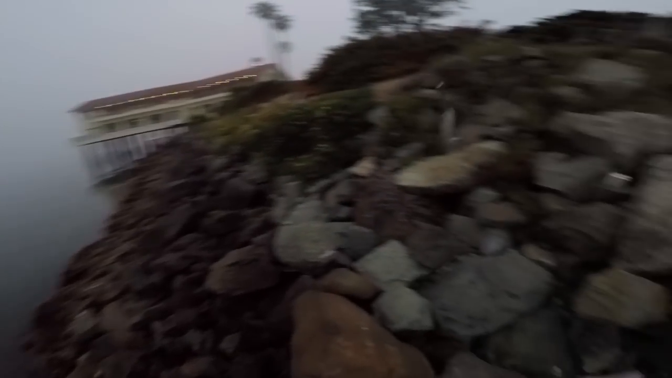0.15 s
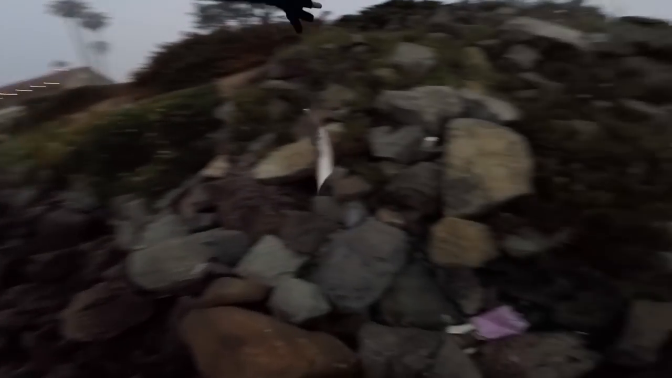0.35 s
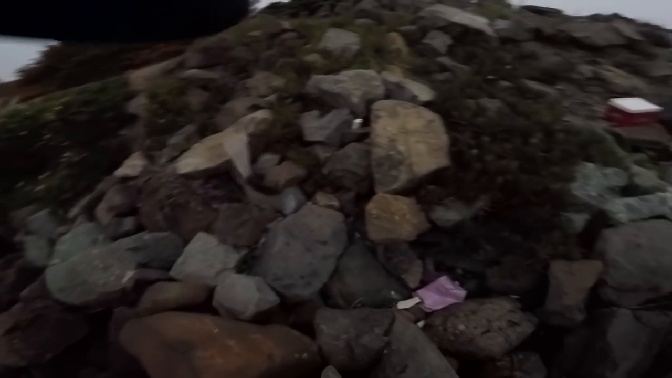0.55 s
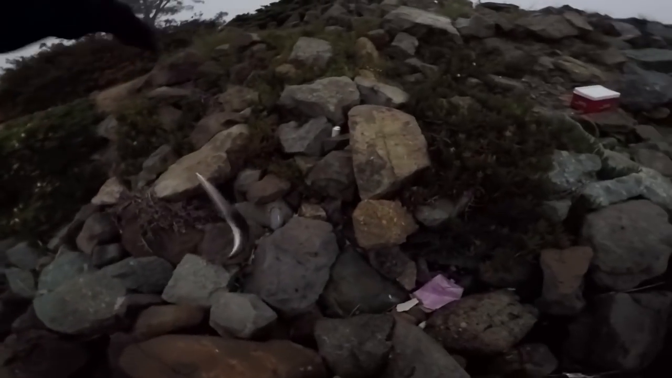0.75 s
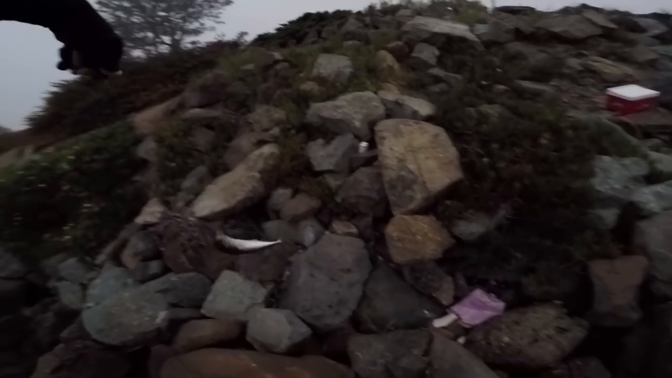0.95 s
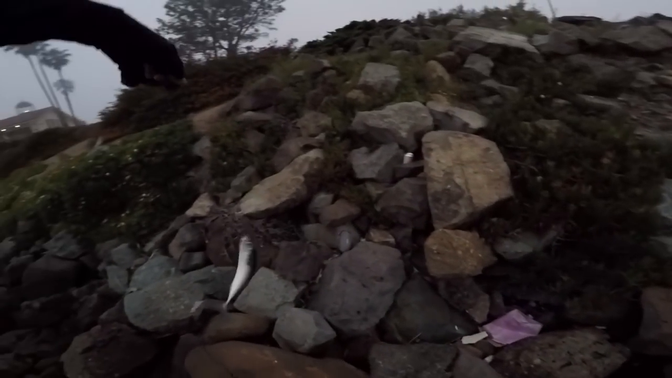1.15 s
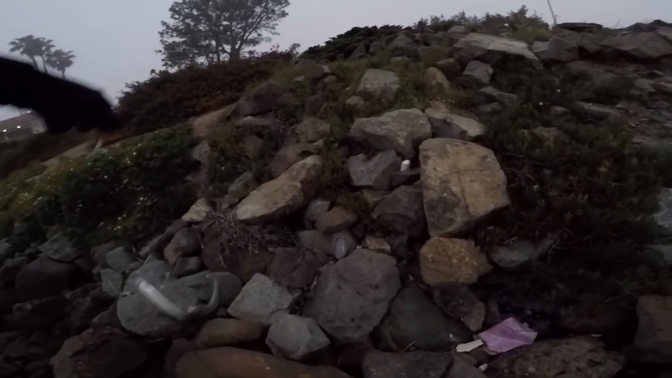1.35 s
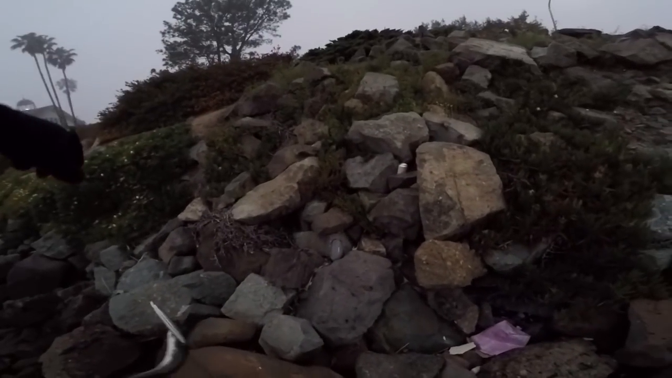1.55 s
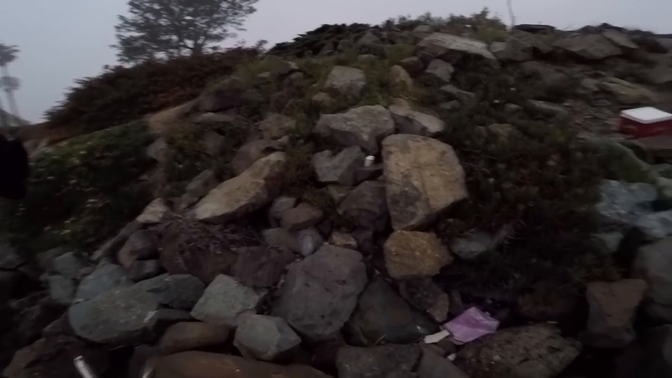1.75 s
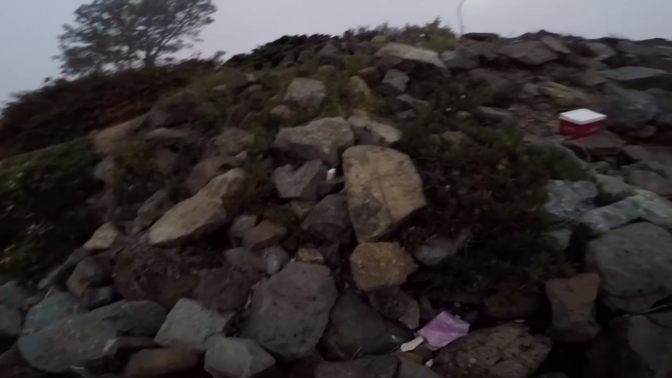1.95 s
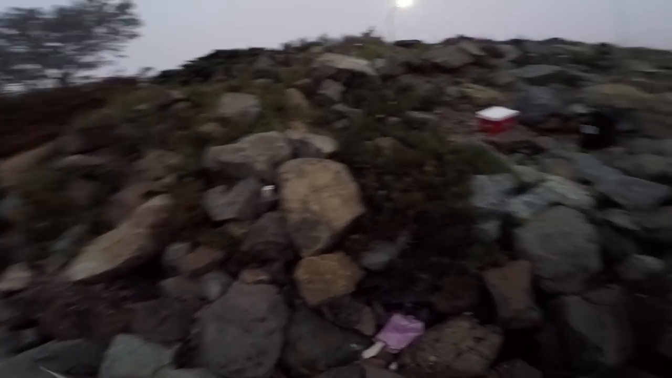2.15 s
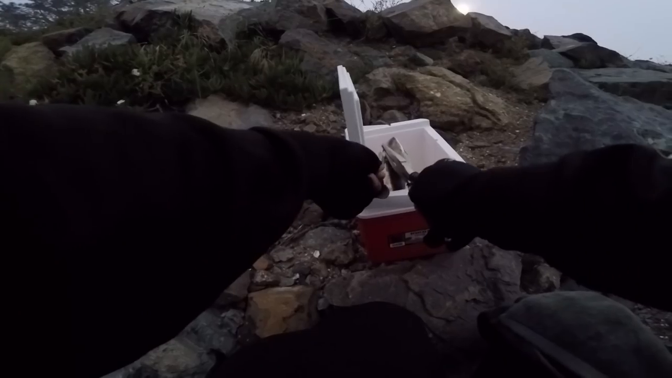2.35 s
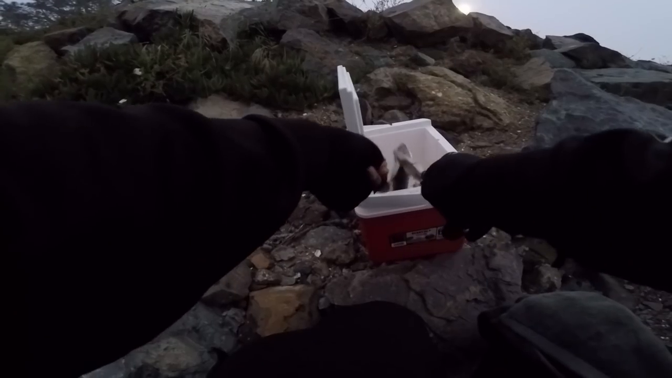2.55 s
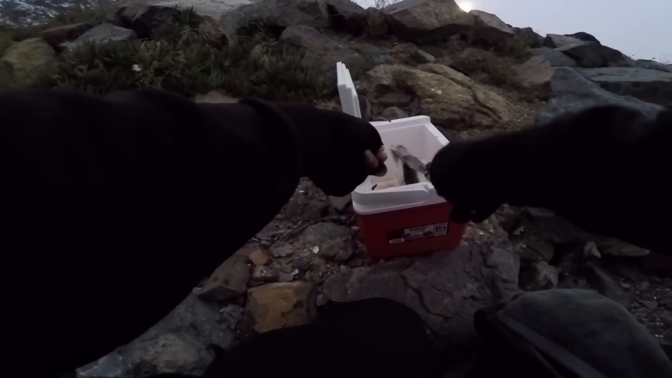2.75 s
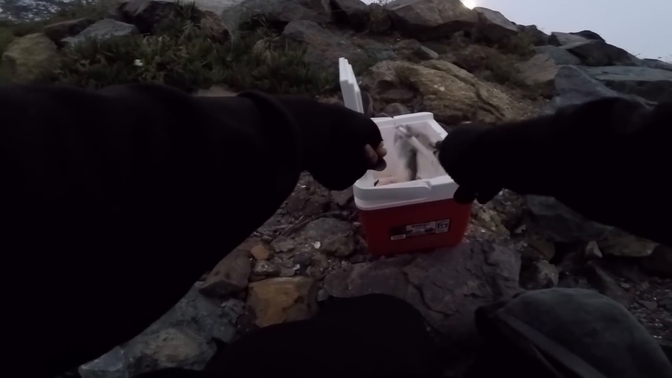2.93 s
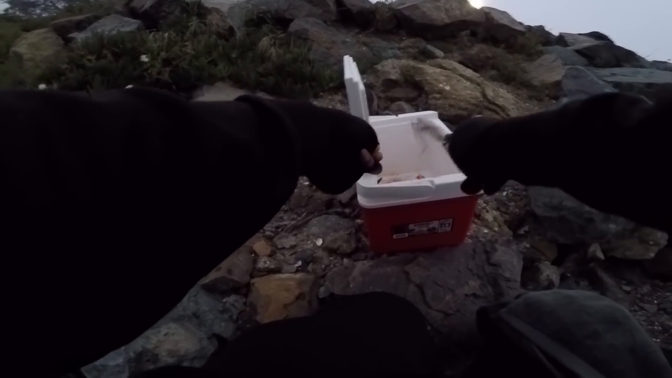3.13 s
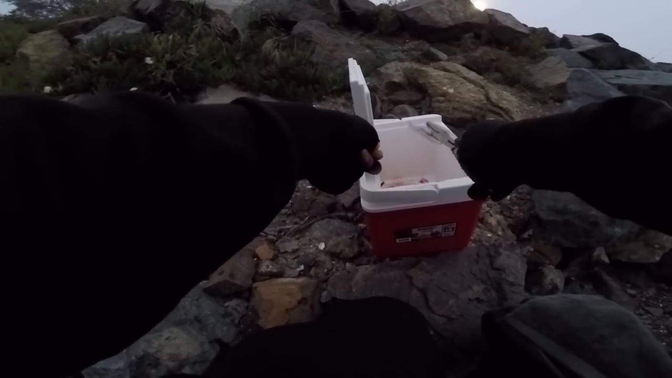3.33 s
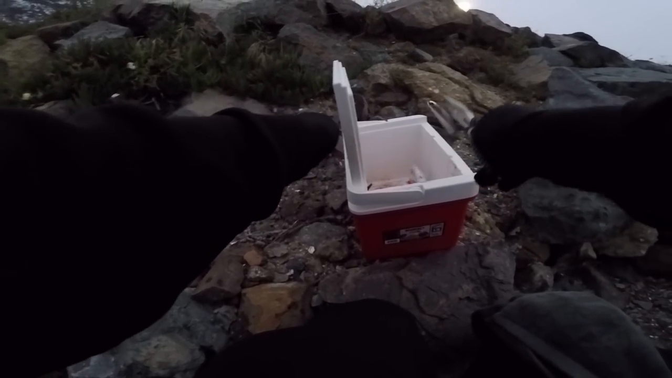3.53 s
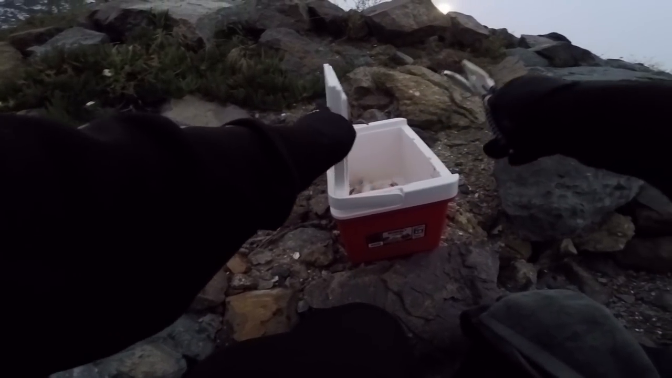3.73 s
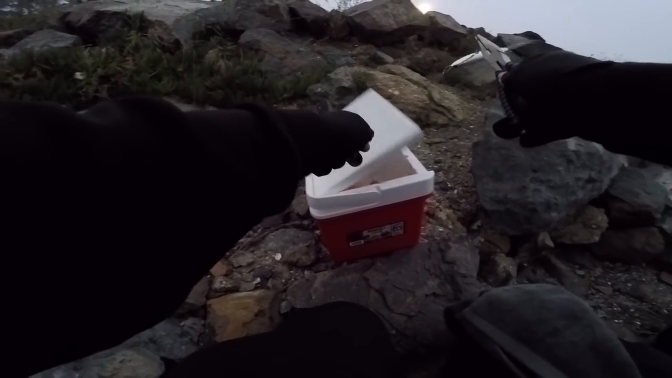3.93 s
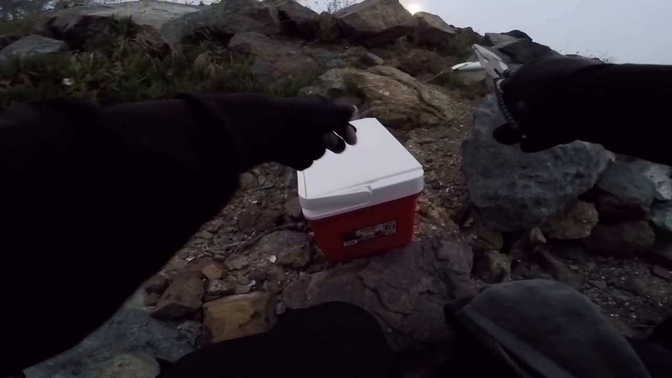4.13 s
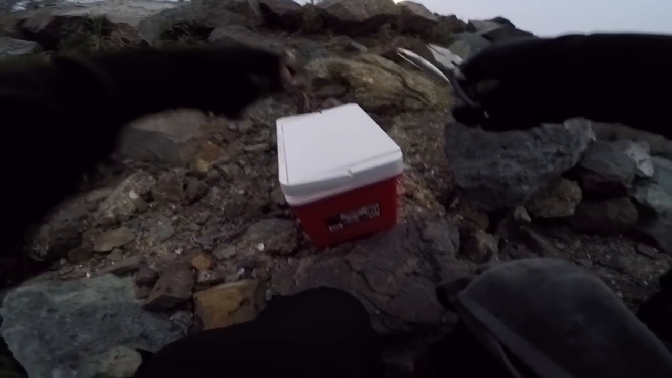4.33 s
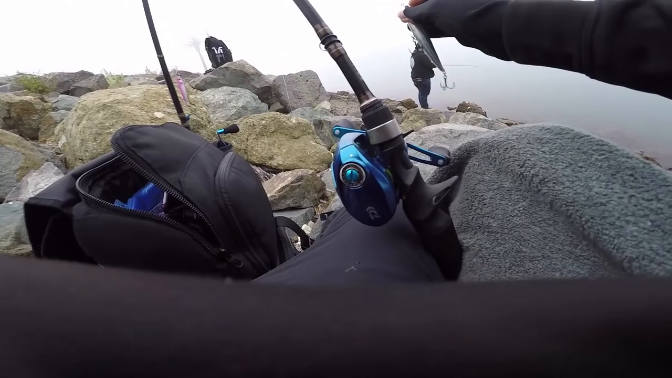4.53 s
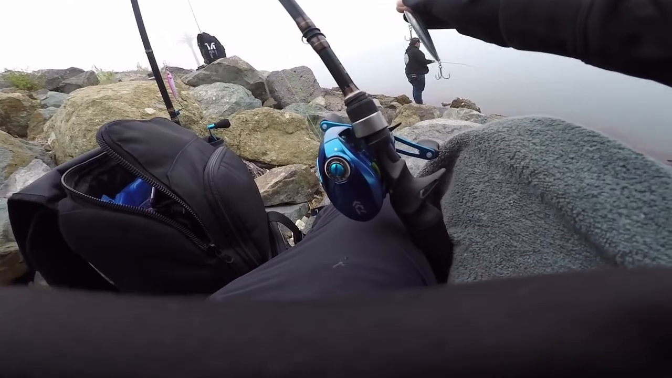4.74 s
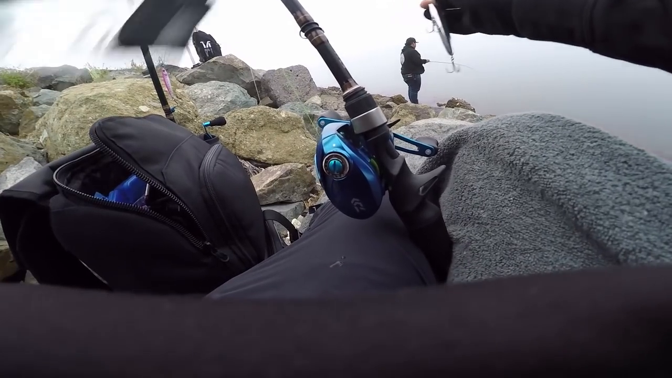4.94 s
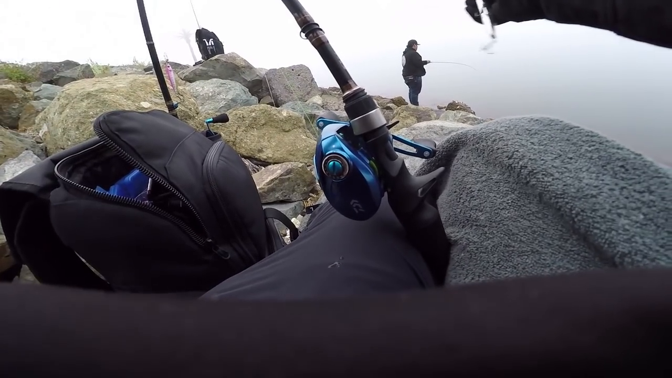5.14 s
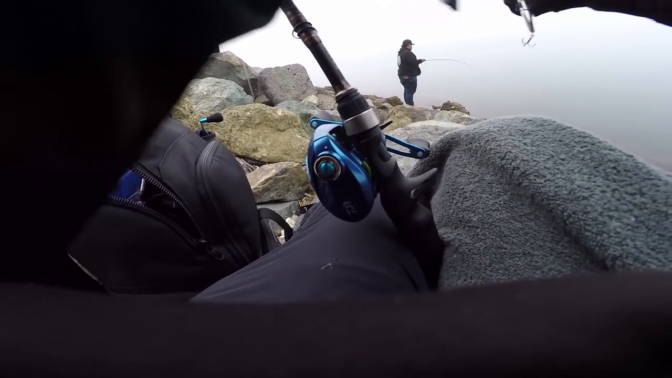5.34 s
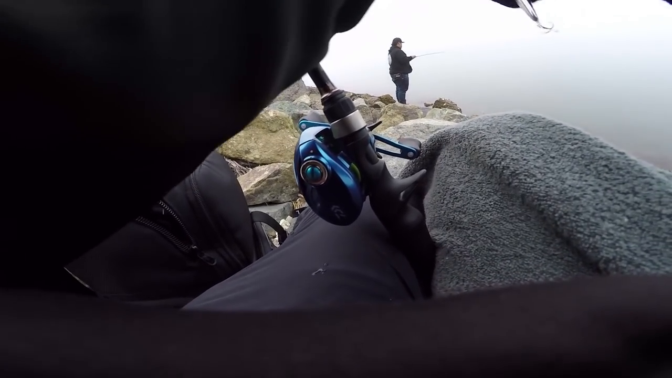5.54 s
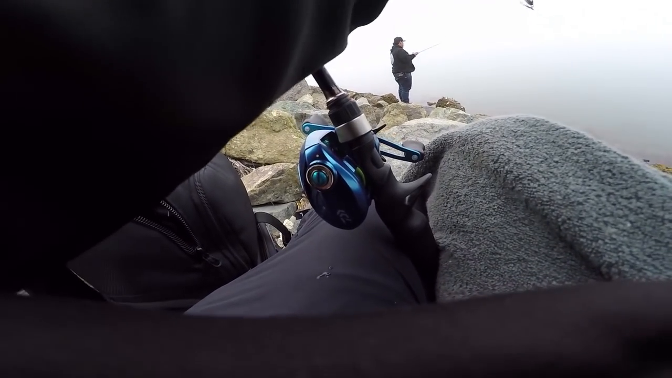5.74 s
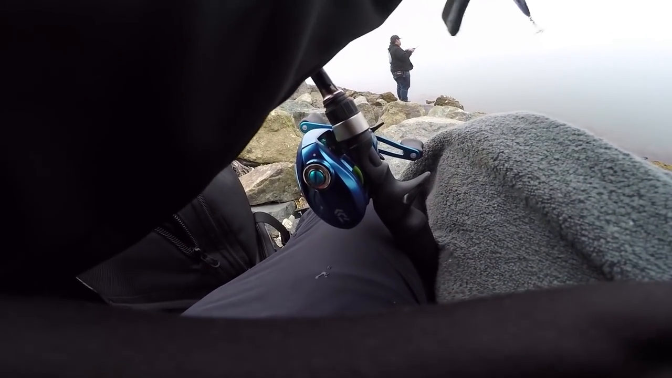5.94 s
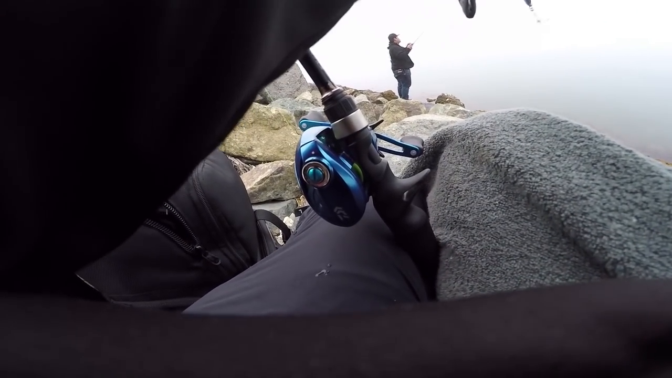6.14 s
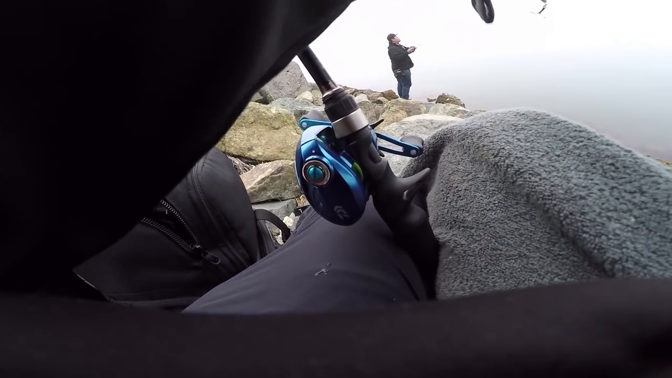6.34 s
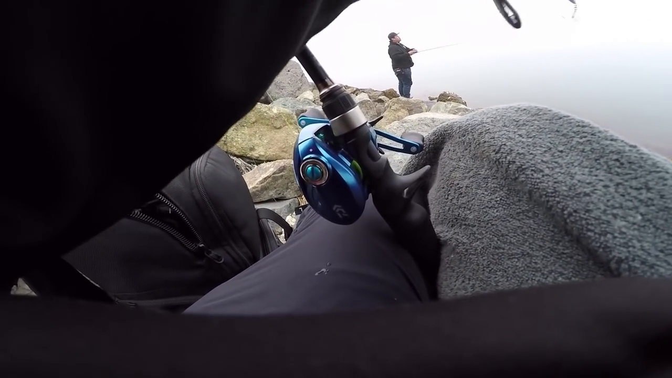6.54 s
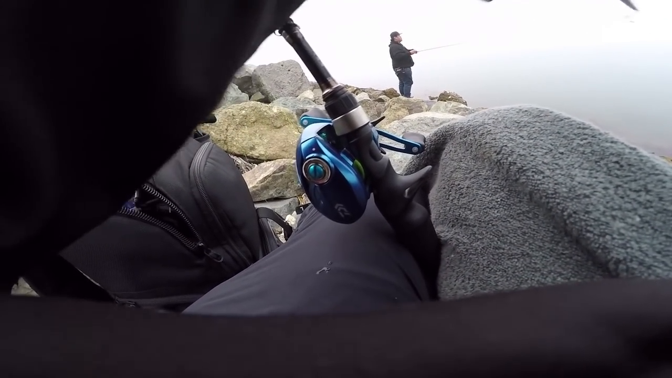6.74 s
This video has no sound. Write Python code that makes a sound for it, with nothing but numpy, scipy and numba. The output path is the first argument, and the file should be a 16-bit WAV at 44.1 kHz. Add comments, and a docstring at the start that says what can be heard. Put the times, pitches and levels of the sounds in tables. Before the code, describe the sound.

Outdoors on shore rocks, a body-worn microphone picks up a constant low rumble and the close, crisp crackle of a moving jacket. Hollow knocks on a plastic cooler join in, leading to a deep thump as the lid closes. After a quieter stretch with a sliding sleeve and scattered creases, a hook-and-loop flap tears open, first in separate pops, then in a dense rip.

```python
"""Jacket cloth crackles and rubs on the microphone port of a chest-worn camera, on a rocky shore.
Under it a low rumble wavers in a faint wash of air. Hands knock a plastic cool box and shut its lid:
the walls ring, squeezed air thuds. A boot squeaks twice on stone, thin hisses pass, a sleeve slides.
Last, a hook-and-loop flap rips open: single hooks pop, then tear densely."""
import sys
import numpy as np
from scipy import signal
from scipy.fft import rfft, irfft
from scipy.io import wavfile
from scipy.ndimage import uniform_filter1d
from numba import njit

SR = 44100
rng = np.random.default_rng(int(sys.argv[2]) if len(sys.argv) > 2 else 0)


def generate_wav(sig):
    """Save sig (samples, or channels by samples) to the path in sys.argv[1] as 16-bit PCM at SR."""
    pcm = np.round(np.clip(np.atleast_2d(sig).T, -1, 1) * 32767).astype(np.int16)
    wavfile.write(sys.argv[1], SR, pcm)


N = 303408

# loud creases (time [s], peak [dB], relative tail [dB], dull tilt [dB], bright tilt [dB])
CREASE_SNAPS = [(0.0303, -16.5, -12, -5, -4), (0.0645, -27, -16, -17, -1), (0.1002, -16, -17, -12, -5),
                (0.1924, -15, -20, -17, -15), (0.2098, -11, -16, -17, -9), (0.2366, -13, -24, -8, -9),
                (0.2713, -22, -6.5, -16, -6.5), (0.3232, -13, -13.5, -6, -8.5), (0.407, -18, -28, -27, -11),
                (0.4656, -22.5, -22, -20, -9), (0.4852, -18.5, -12, -9, -12), (0.5317, -19.5, -20, -5, -6),
                (0.5992, -18, -24, -6.5, -11), (0.6325, -13.5, -14.5, -9.5, -3), (0.6856, -23, -14, -3, -9),
                (0.749, -22.5, -4.5, -11, -5), (0.7716, -17, -8, -7.5, -3.5), (0.854, -24.5, -8, -5, 1),
                (0.9569, -19.5, -13, 1, -7), (0.9773, -18.5, -27, -14, -7), (1.0025, -16, -19, -17, -11),
                (1.0154, -19.5, -3.5, -16, -6.5), (1.0687, -17, -30, -21, -11), (1.104, -17, -9, -12, -6),
                (1.1317, -14, -19, -15, -9), (1.1841, -23, -2, -9, -2.5), (1.1983, -10.5, -40, -9, -7),
                (1.2267, -24, -15, -23, -8), (1.273, -22, -12, -6.5, 1), (1.304, -16.5, -8, -11, -9),
                (1.3466, -13.5, -15, -16, -5), (1.357, -10.5, -16, -10.5, -7), (1.4728, -29, -5, -21, -3),
                (1.506, -20, -15, -10, -11), (1.5342, -19.5, -11, -11, -7), (1.5925, -24, -8, -9.5, -8),
                (1.7032, -27.5, -10.5, -8, -3), (1.773, -20, 0, -5.5, -2.5), (1.79, -18.5, -12, -7, -4),
                (1.8203, -23, -14, -4, -5), (1.9056, -27, 0.5, -7.5, -4), (2.0088, -27, -11, -15, -3),
                (2.0387, -28, -22, -11, -4), (2.1161, -24, -8, -8, -10), (2.155, -19.5, -6, -9, -7),
                (2.209, -24.5, -23, -10, -5), (2.3107, -18, -12.5, -13, -3), (2.5047, -22, -5, -9, -12),
                (2.5204, -25, -24, -14, -13), (2.5802, -26, -5.5, -7.5, -6),
                (2.607, -17.5, -12.5, -5.5, -9), (2.6486, -22, -13, -17, -20), (2.6689, -25, -3, -15, -7),
                (2.7019, -23.5, -3, -9.5, -11), (2.7202, -18.5, -2.5, -4.5, -5.5),
                (2.7636, -18, -6, -13, -10), (2.8022, -15, -25, -27, -14), (2.8349, -9.5, -8, -9.5, -9),
                (2.8399, -26, -9, -13, -8), (2.8659, -36, -28, -19, -11), (2.954, -13, -2.5, -1.5, -5),
                (2.9854, -15, -15, -11, -8), (3.0024, -6, -8.5, -23, -3), (3.0111, -9.5, -14, -4.5, -3),
                (3.0591, -15.5, -1.5, -14, -7), (3.1088, -15, -1.5, -13, -5), (3.1759, -8.5, -7, -6, -4.5),
                (3.2151, -21.5, -2, -16, 1), (3.242, -15, -4.5, -11, -8), (3.2722, -17, -5, -11, -5),
                (3.2867, -6.5, -6.5, -7.5, -1), (3.313, -17, -11, -11, -6), (3.34, -15, -9.5, -0.5, 2.5),
                (3.3912, -25, -4, -13, -11), (3.4624, -18, -8, -3, 2.5), (3.5688, -32, -21, -24, -11),
                (3.591, -21.5, -6, -20, -11), (3.6556, -5.5, -29, -25, -33), (3.7506, -27, -13, -9, -15),
                (3.8217, -26.5, -26, 5, -5), (4.0613, -22.5, 0, 2, -9), (4.205, -20.5, -15, 4, -6),
                (4.9763, -22.5, -24, -4.5, -24), (5.1307, -30, -20, -11, -11), (5.1455, -21, -2, -11, -4),
                (5.1503, -7, -20, -16, -10), (5.2031, -16, -18, -15.5, -13), (5.2796, -15.5, -32, -24, -26),
                (5.289, -34, -16, -1, -15), (5.5004, -40, -8, -3, -14), (5.5231, -34, -12, -8, -6),
                (5.6531, -29.5, -6, -8, -9), (5.7486, -22, -24, -4, -21), (5.758, -22.5, -13, -9, -11),
                (5.8523, -27, -8.5, -0.5, -7), (5.88, -34.5, -5, -7, -10), (5.993, -33, -22, -1, -14),
                (6.002, -37, -24, -4, -14), (6.0696, -33, -15, -2, -25), (6.2298, -32.5, -19, 1, -15)]
# cloth rubbing (time [s], level [dB], dull tilt [dB], bright tilt [dB], relative housing ring [dB])
CLOTH_RUB = [(0.0, -35, -2, -11, -11), (0.1, -44.5, 0.5, -4.5, -16), (0.26, -51, 5, -11.5, -23),
             (0.97, -46, -3.5, -8, -19), (1.17, -46.5, -5, -7, -17), (1.3, -46, -1, -8.5, -20),
             (1.81, -50.5, 0, -9.5, -17), (1.95, -46.5, -0.5, -10, -24), (2.35, -53.5, 0, -14, -9),
             (2.56, -57.5, -3.5, -16, -24), (2.82, -42.5, -6.5, -9, -11), (3.18, -36.5, -2.5, -12, -1),
             (3.42, -42.5, -10, -13, -17), (3.63, -48.5, -3.5, -9, -20), (3.81, -51.5, 2, -16, -15),
             (4.02, -75.5, -2, -19, -25), (5.0, -68, 3, -10, -8), (5.16, -57.5, 3.5, -5, -4),
             (5.56, -63.5, -3, -12, -15), (5.81, -57, -2, -7, -12), (6.09, -69, 1, -12, -17),
             (6.3, -60, 3, -7, -9)]
# microphone port resonances (centre [Hz], width [Hz], lift [dB])
PORT_PEAKS = [(2005, 240, 6.5), (4340, 1200, 8.5), (6570, 750, 2.5), (10050, 810, 4.5), (12100, 680, 7)]
# camera housing resonances (centre [Hz], width [Hz], lift [dB])
HOUSING_PEAKS = [(2060, 200, 14), (4400, 260, 26), (6700, 350, 20), (10250, 400, 16), (12400, 450, 14)]
# low hum (time [s], pitch [Hz], level [dB])
HUM = [(0, 46, -26), (.34, 48.6, -33.5), (.7, 48.74, -26.5), (1.3, 48.97, -31.5), (1.45, 42.35, -33.5),
       (2.25, 42.5, -32), (2.4, 42.3, -26.5), (3.15, 43.95, -26), (3.3, 44.4, -34.5), (3.5, 43.4, -30),
       (3.6, 43.6, -23), (3.9, 44.2, -34.5), (4.4, 42.73, -28), (4.7, 42.78, -32.5), (5.65, 42.5, -33),
       (6.2, 43.5, -31.5), (6.5, 41.27, -32), (6.88, 38.6, -35)]
# growl around the hum (time [s], level [dB])
GROWL_LEVELS = [(0.0, -40.5), (1.65, -45.5), (3.16, -35.5), (4.08, -36.5), (4.3, -40.5), (5.25, -42),
                (6.59, -43), (6.88, -44)]
# fainter drones (pitch [Hz], level [dB], start [s], end [s])
DRONE_TONES = [(30.6, -38, 0, 6.88), (42, -39.5, 0.24, 1.2), (125, -55, 0, 3.3), (61.3, -42, 0.14, 4.6),
               (101, -45, 1.8, 8), (148.2, -46.5, 0.12, 2.6), (181.4, -57.5, 0.82, 3.3)]
# air spectrum (frequency [Hz], gain [dB])
AIR_SPECTRUM = [(88, -18), (150, -3.5), (217, 0), (297, -1.5), (566, -12.5), (821, -18.5), (2100, -20.5),
                (2400, -27.5), (4670, -23.5), (14500, -38), (16000, -36)]
# blows on the box (time [s], peak [dB], main mode [Hz], relative upper modes [dB], relative crack [dB])
BOX_KNOCKS = [(0.093, -50, 283, 2, 20), (0.49, -36, 272, -10, 6.5), (0.682, -43.5, 253, -9, 3),
              (2.332, -20, 278, -23, -14), (2.397, -24.5, 280, -26, -32), (2.555, -35, 271.5, -36, -28),
              (2.955, -19, 300.5, -11, -5.5), (3.106, -18, 297, -14, -1.5), (3.134, -17, 254, -14.5, -17),
              (3.212, -23.5, 277, -25, -20), (3.39, -19.5, 373, -1, -2), (3.405, 0.5, 326, -19.5, -16),
              (3.457, -23, 264, -24, -22), (3.511, -24, 289, -11, -4.5), (3.635, -15, 292, -13.5, -28),
              (3.654, -19.5, 328, -9, 7), (3.684, -10, 286, -17, -8.5), (3.744, -27, 296, -8, -2.5),
              (3.788, -26, 373, -19, -8), (3.823, -15.5, 336, -9, -8.5), (3.872, -20, 254, -4.5, -20),
              (3.909, -26.5, 247, -11, -19), (4.062, 4, 282, -15.5, -17), (4.077, -5, 258, -25, -14.5),
              (4.106, -13, 282, -15, -14.5), (4.206, -2.5, 344.5, -12, -8), (4.294, -37, 328, -22, -29),
              (4.525, -26.5, 337, -30, -24)]
# upper wall modes (frequency [Hz], gain [dB], t60 [s])
WALL_MODES = [(500.4, 6.5, 0.07), (714, -1.5, 0.073), (960, -49, 0.24), (1177, -27.5, 0.083),
              (1587, -28, 0.086), (1896, -23, 0.062)]
# boot squeaks (start [s], length [s], first pitch [Hz], last pitch [Hz], peak [dB])
BOOT_SQUEAKS = [(0.766, 0.1, 917, 855, -38), (0.896, 0.088, 890, 748, -40.5)]
# thin hisses, one track each (time [s], centre [Hz], level [dB])
HISS_TRACKS = [
    [(2.03, 1574, -63), (2.1, 1530, -51.5), (2.27, 1620, -53.5), (2.33, 1600, -63)],
    [(4.28, 3585, -66), (4.31, 3550, -62), (4.38, 3310, -63), (4.47, 2906, -65), (4.52, 2756, -58)],
    [(5.28, 2030, -70), (5.33, 2070, -56), (5.38, 2050, -59), (5.44, 2120, -68)],
]
# air squeezed from the box (time [s], peak [dB])
AIR_PUFFS = [(2.333, -27), (2.953, -46), (3.106, -26), (3.406, -26), (3.656, -30.5), (4.062, -4),
             (4.076, -13), (4.106, -15), (4.205, -18), (4.525, -24.5)]
# modes of a puff's thud (frequency [Hz], gain [dB], t60 [s])
THUD_MODES = [(78.5, 5, 0.038), (114.5, 5, 0.061), (171, -6, 0.19)]
# hands and catch scuffing the box (time [s], level [dB])
SCUFF_LEVELS = [(2.9, -72), (3.08, -48), (3.15, -14), (3.25, -46), (3.5, -43), (3.62, -41), (3.76, -14.5),
                (3.83, -29.5), (3.9, -52), (4.0, -39)]
# sliding sleeve (time [s], level [dB], relative low band [dB])
SLEEVE_SLIDE = [(4.53, -55, 22), (4.536, -71, 7), (4.588, -52, 6.5), (4.722, -47.5, 0.5), (4.79, -74, 9)]
# loud hooks tearing loose (time [s], peak [dB])
HOOK_POPS = [(6.292, -14.5), (6.317, -9), (6.3255, -7.5), (6.3368, -13), (6.356, -9.5), (6.3845, -20),
             (6.4071, -9.5), (6.4119, -5), (6.4224, -17), (6.4262, -13.5), (6.4334, -19), (6.4585, -14.5),
             (6.471, -10), (6.4762, -20), (6.4833, -8), (6.5001, -6), (6.5074, -21), (6.5362, -7),
             (6.5644, -7), (6.5794, -9), (6.6119, -3.5), (6.6255, 0), (6.6846, 2), (6.7215, -9),
             (6.7481, 0), (6.7683, 5.5), (6.7833, 9), (6.8118, -14)]
# resonances of a popping hook (centre [Hz], width [Hz], lift [dB])
HOOK_PEAKS = [(3050, 1200, 20), (5300, 1100, 13)]
# flap peeling, catching, last tug (time [s], level [dB])
PEEL_LEVELS = [(6.44, -54), (6.52, -27), (6.575, -15.5), (6.605, -20.5), (6.63, -22), (6.675, -15),
               (6.688, -12.5), (6.705, -16), (6.725, -12), (6.752, -12), (6.76, -23.5), (6.766, -51),
               (6.769, -9.5), (6.785, -9.5), (6.789, -32), (6.792, -10.5), (6.81, -36)]
# flap spectrum (frequency [Hz], gain [dB])
FLAP_SPECTRUM = [(290, -13), (500, -14.5), (933, -25), (1320, -4.5), (1790, -5.5), (3440, 0), (4600, -4),
                 (6800, -4), (8960, -11), (14700, -15.5), (16000, -21)]
# chest thump (time [s], level relative to peeling [dB])
CHEST_THUMP = [(6.44, -22), (6.62, -27), (6.75, -10), (6.81, -7.5)]


def undb(db):
    """Decibels to gain."""
    return 10 ** (np.asarray(db) / 20)


def white():
    """White noise, rms 1."""
    return rng.standard_normal(N)


def curves(table):
    """Columns per sample, then a gate open over the table's span."""
    times_s, *columns = np.transpose(table)
    t = np.arange(N) / SR
    gate = uniform_filter1d(1. * ((t >= times_s[0]) & (t <= times_s[-1])), size=200)
    return [np.interp(t, times_s, column) for column in columns] + [gate]


def colour(x, spectrum, peaks=()):
    """Minimum-phase filter from (Hz, dB) points and resonances; unit power gain."""
    hz = np.arange(1025) * SR / 2048 + 1
    point_hz, point_db = np.transpose(spectrum)
    db = np.interp(np.log(hz), np.log(point_hz), point_db)
    for centre_hz, width_hz, lift_db in peaks:
        db = db + lift_db / (1 + (2 * (hz - centre_hz) / width_hz) ** 2)
    cepstrum = irfft(db * np.log(10) / 20)
    cepstrum[1:1024] *= 2
    cepstrum[1025:] = 0
    response = irfft(np.exp(rfft(cepstrum)))
    return signal.oaconvolve(x, response / np.sqrt(np.sum(response ** 2)))[:N]


@njit
def bandpass(x, hz, width_hz):
    """State-variable band-pass, moving centre."""
    y, band, low = np.empty(len(x)), 0., 0.
    for i in range(len(x)):
        g, damping = np.tan(np.pi * hz[i] / SR), width_hz / hz[i]
        v = (band + g * (x[i] - low)) / (1 + g * (g + damping))
        band, low = 2 * v - band, low + 2 * g * v
        y[i] = damping * v
    return y


def wander(rate_hz):
    """Ramps between random levels."""
    step = int(SR / rate_hz)
    return 0.746 * uniform_filter1d(np.repeat(rng.standard_normal(N // step + 1), step), step)[:N]


def pops(times_s, peak_db):
    """One impulse per event, random sign."""
    y = np.zeros(N)
    y[(times_s * SR).astype(int)] = undb(peak_db) * rng.choice([-1, 1], size=len(times_s))
    return y


def bursts(times_s, peak_db, t60_s):
    """Envelope of sudden decaying bursts, summed in power."""
    decay = undb(-120 * np.arange(int(t60_s * SR)) / SR / t60_s)
    onsets = np.zeros(N)
    np.add.at(onsets, (times_s * SR).astype(int), undb(2 * peak_db))
    return np.sqrt(np.abs(signal.oaconvolve(onsets, decay)[:N]))


def grit(rate_hz, spread_db, tail_s):
    """Envelope of random, uneven slips, rms 1."""
    hits = (rng.random(N) < rate_hz / SR) * undb(spread_db * np.minimum(rng.exponential(size=N), 4))
    y = 0.51 + signal.lfilter([1], [1, -np.exp(-1 / (tail_s * SR))], hits)
    return y / np.sqrt(np.mean(y ** 2))


def ring(time_s, peak_db, modes):
    """Softly pushed modes, randomly detuned per blow."""
    out, t = np.zeros(N + SR), np.arange(SR // 5) / SR
    hz, db, t60_s = np.transpose(modes)[:, :, None]
    hz = hz * (1 + 0.028 * rng.standard_normal(hz.shape))
    tone = np.sum(undb(db - 60 * t / t60_s) * np.sin(2 * np.pi * hz * t), axis=0)
    attack = 1 - np.exp(-t / 0.0022)
    start = int(time_s * SR)
    out[start:start + len(t)] = undb(peak_db + 0.5) * tone * attack
    return out[:N]


def small_snaps(rub_db, count=260):
    """Small creases trail loud ones, a few lead. Columns as CREASE_SNAPS."""
    parents = np.array(CREASE_SNAPS)[rng.integers(len(CREASE_SNAPS), size=count)]
    lag_s = 0.028 * rng.exponential(size=count) - 0.0086
    times_s = np.clip(parents[:, 0] + lag_s, 0, CLOTH_RUB[-1][0])
    scatter_db = 4 * np.clip(rng.standard_normal((count, 4)), -2, 1.5)
    levels_db = scatter_db + [-10, -13, -14.5, -12]  # peak, tail, dull, bright
    levels_db[:, 0] += np.minimum(parents[:, 1], rub_db[(times_s * SR).astype(int)] + 31)
    return np.c_[times_s, levels_db]


def cloth():
    """Creases snap and cloth rubs, in three bands coloured by the port; both ring the housing."""
    rub_db, rub_dull_db, rub_bright_db, housing_db, _ = curves(CLOTH_RUB)
    times_s, peak_db, tail_db, dull_db, bright_db = np.vstack([CREASE_SNAPS, small_snaps(rub_db)]).T
    slips = grit(rate_hz=300, spread_db=5.55, tail_s=0.00082) * undb(2.1 * wander(44))
    noise = white()
    dull = [(500, -17), (1200, -14), (2800, -5), (4000, -6.5), (9000, -60)]
    middle = [(1500, -27.5), (3300, 7.5), (7500, 2.5), (10000, -23.5)]
    bright = [(4000, -23.5), (8500, 7), (15000, 1.5)]
    bands = [(dull, peak_db + dull_db + 3, rub_db + rub_dull_db + 2.5),
             (middle, peak_db + 0.1, rub_db + 1.5),
             (bright, peak_db + bright_db - 1.5, rub_db + rub_bright_db + 2.5)]
    out = 0
    for spectrum, snap_db, slip_db in bands:
        clicks = pops(times_s, snap_db + 6) + noise * bursts(times_s, snap_db - 9, t60_s=0.004)
        tails = bursts(times_s, snap_db + tail_db + 0.5, t60_s=0.069)
        tails = uniform_filter1d(tails, size=1 + int(0.004 * SR))  # 4 ms attack
        friction = (0.42 + 0.18 * slips) * tails + slips * undb(slip_db)
        out = out + colour(clicks + noise * friction, spectrum, PORT_PEAKS)
    drive = noise * slips * undb(rub_db + housing_db + 1.4 * wander(9))
    drive += pops(times_s, peak_db - 3 - np.maximum(bright_db + 14, -8))  # dull snaps ring most
    return out + colour(drive, [(1000, -31), (4000, 12.5), (12000, -0.5)], HOUSING_PEAKS)


def rumble():
    """Wavering low hum, noisy growl, fainter drones."""
    hum_hz, hum_db, _ = curves(HUM)
    phase = 2 * np.pi * np.cumsum(hum_hz * (1 + 0.0677 * wander(45))) / SR
    hum = undb(hum_db + 1 + 4.1 * wander(13)) * np.sin(phase)
    growl_db, _ = curves(GROWL_LEVELS)
    spectrum = [(20, 0.5), (40, -7.5), (70, 11), (100, 5.5), (155, -3), (220, -13.5), (500, -51.5)]
    out = hum + colour(white(), spectrum) * undb(growl_db + 0.81 * wander(23))
    for drone_hz, drone_db, start_s, end_s in DRONE_TONES:
        gate, = curves([(start_s,), (end_s,)])
        swell = undb(drone_db - 0.5 + 4 * wander(10))
        phase = 2 * np.pi * np.cumsum(drone_hz + 2.74 * wander(24.9)) / SR
        out += gate * swell * np.sin(phase)
    return out


def air():
    """Faint broad wash; the level drifts."""
    return colour(white(), AIR_SPECTRUM) * undb(-52.5 + 2 * wander(3.3))


def box_knocks():
    """Each blow rings the plastic walls and adds a short crack."""
    out = 0
    for time_s, peak_db, main_hz, upper_db, crack_db in BOX_KNOCKS:
        main_t60_s = 0.083 * (1 - 0.019 * peak_db)  # lighter blows ring longer
        modes = [(main_hz, 0, main_t60_s), (1.147 * main_hz, -6, 0.08), (0.884 * main_hz, -8, 0.09)]
        for hz, db, t60_s in WALL_MODES:
            modes.append((hz, db + (crack_db + 10 if hz > 800 else upper_db), t60_s))
        out = out + ring(time_s, peak_db, modes)
    times_s, peak_db, _, _, crack_db = np.transpose(BOX_KNOCKS)
    cracks = white() * bursts(times_s, peak_db + crack_db - 4.5, t60_s=0.035)
    return out + colour(cracks, [(300, -17), (800, 7.5), (2500, -2), (5000, -9), (12000, -46)])


def boot_squeaks(rise_s=0.028):
    """Rubber stick-slip on stone: trembling, sagging tone, weak overtones."""
    out = 0
    for start_s, length_s, first_hz, last_hz, peak_db in BOOT_SQUEAKS:
        edge_db = peak_db - 17.5
        hz, db, gate = curves([(start_s, first_hz, edge_db),
                               (start_s + rise_s, 0.34 * first_hz + 0.7 * last_hz, peak_db),
                               (start_s + 1.94 * rise_s, last_hz, edge_db),
                               (start_s + length_s, last_hz, edge_db)])
        phase = 2 * np.pi * np.cumsum(hz * (1 + 0.03 * wander(200))) / SR
        tone = sum(gain * np.sin(k * phase) for k, gain in enumerate([1, 0.15, 0.15, 0.12], 1))
        out = out + gate * undb(db + 5 + 4.3 * wander(71)) * tone
    return out


def hisses(width_hz=620.):
    """Thin, gliding bands of noise."""
    out = 0
    for track in HISS_TRACKS:
        hz, db, gate = curves(track)
        band = bandpass(bandpass(white(), hz, width_hz), hz, width_hz)
        out = out + gate * undb(db) * band / band.std()
    return out


def box_thuds():
    """Air squeezed from the box thuds in three low modes."""
    return sum(ring(time_s, peak_db, THUD_MODES) for time_s, peak_db in AIR_PUFFS)


def box_scuffs():
    """Hands and catch scuff; the walls hum."""
    db, gate = curves(SCUFF_LEVELS)
    friction = white() * gate * undb(db + 3.5) * grit(rate_hz=55, spread_db=8.8, tail_s=0.011)
    wall_peaks = [(281.6, 64, 16.6), (514, 38, 6), (720, 66, 5.6)]
    return colour(friction, [(100, -30), (210, 8.5), (700, -7.5), (1500, -30)], wall_peaks)


def sleeve_slide():
    """Smooth cloth friction: one broad band, one low."""
    db, low_db, gate = curves(SLEEVE_SLIDE)
    friction = white() * gate * undb(db + 3.8 * wander(87))
    broad = colour(friction, [(500, -23), (1200, 5.5), (3200, 2.5), (7000, -10), (15000, -17)])
    return broad + colour(friction * undb(low_db), [(100, -9), (350, 2), (900, -4), (2000, -35)])


def flap_rip():
    """Single hooks pop and ring; dense tearing follows and shakes the chest mount."""
    listed_s, peak_db = np.transpose(HOOK_POPS)
    pop_s = listed_s + 0.0008
    clicks = pops(pop_s, peak_db)
    peel_db, peeling = curves(PEEL_LEVELS)
    thump_db, _ = curves(CHEST_THUMP)
    tearing = peeling * undb(peel_db - 2 + 2.5 * wander(120))
    tearing *= grit(rate_hz=700, spread_db=2.25, tail_s=0.00035)
    tails = bursts(pop_s, peak_db - 14, t60_s=0.0059) + bursts(pop_s, peak_db - 31, t60_s=0.042)
    drive = white() * (tearing + tails) + clicks * undb(-1)
    rip = colour(drive, FLAP_SPECTRUM, peaks=[(3360, 372, 2.5), (5273, 1020, 1.04)])
    shake = colour(white() * tearing * undb(thump_db), [(40, -12), (120, 1), (900, -3.5), (2000, -15.5)])
    ring_drive = clicks * undb(6.5 - 8 * peeling)  # a peeling flap rings less
    return rip + shake + colour(ring_drive, [(1500, -6), (3000, 0), (9000, 0)], HOOK_PEAKS)


def scene():
    """All sources, one microphone."""
    mix = cloth() + rumble() + air() + box_knocks() + boot_squeaks() + hisses()
    mix += box_thuds() + box_scuffs() + sleeve_slide() + flap_rip()
    return mix[None]


def record(dry):
    """Soft clip near full scale, then a steep low-pass."""
    ceiling, cutoff_hz = 0.93, 15400
    clipped = dry / (1 + np.abs(dry / ceiling) ** 6) ** (1 / 6)
    return signal.sosfilt(signal.ellip(8, 0.2, 60, cutoff_hz, fs=SR, output="sos"), clipped)


dry = scene()
out = record(dry)
generate_wav(out)
```